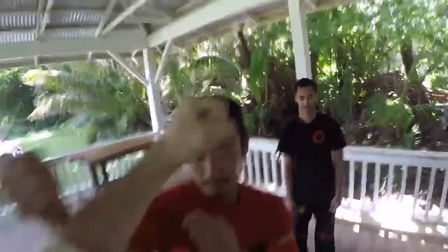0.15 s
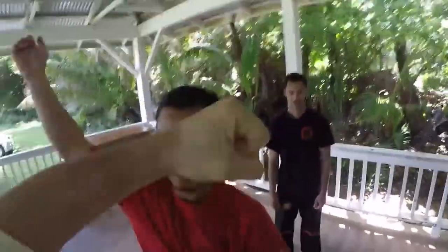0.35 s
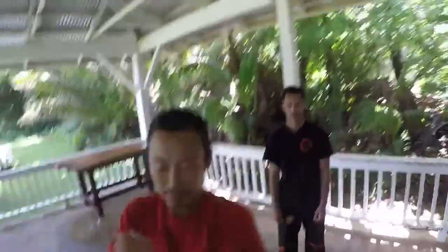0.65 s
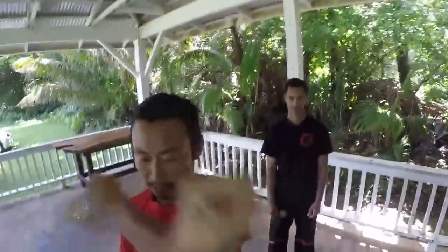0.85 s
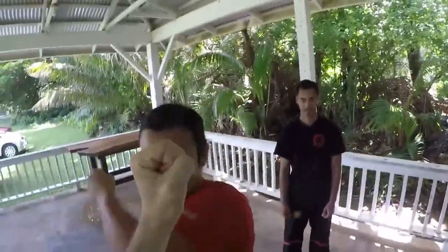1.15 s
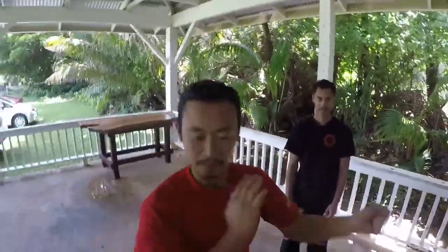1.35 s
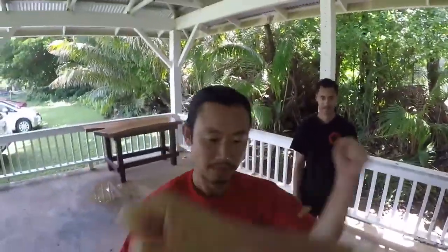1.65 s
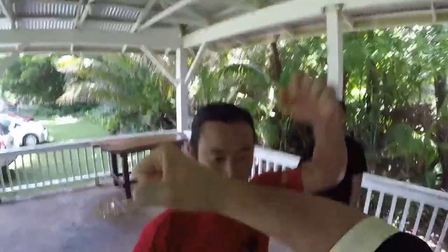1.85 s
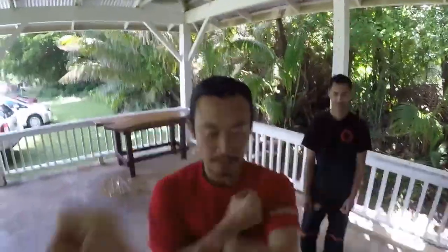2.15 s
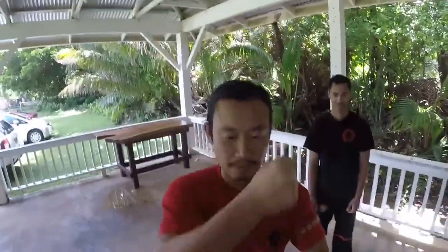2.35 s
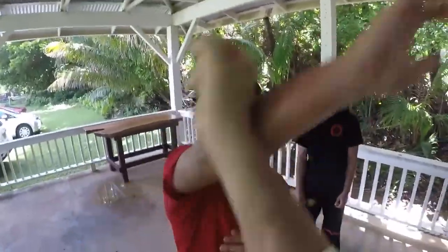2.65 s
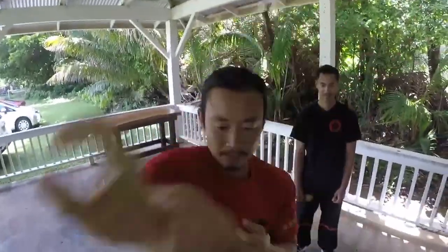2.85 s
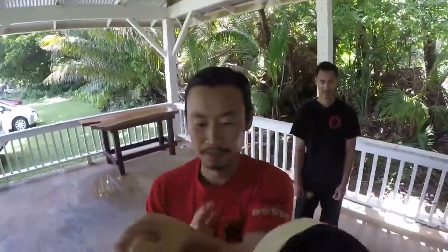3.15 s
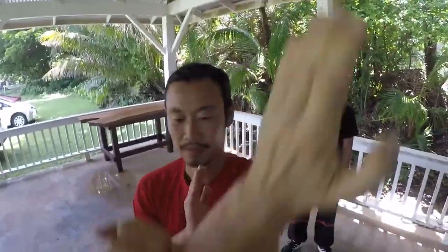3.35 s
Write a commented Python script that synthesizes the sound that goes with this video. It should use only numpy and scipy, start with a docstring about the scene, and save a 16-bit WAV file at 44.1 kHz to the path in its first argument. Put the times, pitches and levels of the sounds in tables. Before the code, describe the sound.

Hands and forearms slap together irregularly on a roofed porch, heard from a body-worn camera; low thumps, mount knocks and wind rumble surround them, the sharpest crack coming just after two seconds, then lighter taps.

```python
"""Two people trade quick blocks on a roofed porch, heard from a camera that one of them wears.
Foliage hiss and air on the ports open it; a first slap follows, with swishing cloth, jolts and mount knocks.
More slaps crack from shaped noise, each with a porch echo; the image narrows and is mono from 1 to 2 s.
Finger ticks, softer swishes and gusts fall between; the hardest slap comes just after 2 s.
Lighter blows follow while the image widens and the hiss rises to the end."""
import sys
import numpy as np
from scipy import signal
from scipy.fft import rfft, irfft
from scipy.io import wavfile
from scipy.ndimage import uniform_filter1d

SR = 44100
rng = np.random.default_rng(int(sys.argv[2]) if len(sys.argv) > 2 else 0)


def generate_wav(sig):
    """Save sig (samples, or channels by samples) to the path in sys.argv[1] as 16-bit PCM at SR."""
    pcm = np.round(np.clip(np.atleast_2d(sig).T, -1, 1) * 32767).astype(np.int16)
    wavfile.write(sys.argv[1], SR, pcm)


N = 154350
T = np.arange(N) / SR  # time_s

# stereo width, a gain on the side signal: time_s, width (0 mono, 1 full)
STEREO_WIDTH = [(0, 0.72), (.35, 0.88), (.55, 0.26), (.85, 0.15), (1.0, .01), (1.97, 0), (2.1, 0.33),
                (2.5, 0.46), (3.5, 0.85)]
# knocks of the camera mount: start_s, level_db (middle), decay_ms (time constant)
MOUNT_KNOCKS = [(0.1223, -31, 5.9), (0.137, -29, 3.5), (0.152, -31.5, 7.6), (0.1691, -18.5, 1.15),
                (0.1767, -22.5, 1.75), (0.212, -32.5, 6.5), (0.224, -30, 5.3), (.236, -37.5, 7.4),
                (.282, -33.5, 2.4), (1.708, -36.5, 1.5), (1.776, -33.5, 6.1), (1.835, -41, 3)]


def undb(db):
    """Decibels to gain."""
    return 10 ** (np.asarray(db) / 20)


def curve(rows):
    """Straight lines through (time_s, value) rows."""
    return np.interp(T, *np.array(rows).T)


def unit(x):
    """Scale to rms 1."""
    return x / np.sqrt(np.mean(x ** 2))


def colour(x, *tables, size=8192):
    """Minimum-phase filter whose response is the sum of (freq_hz, gain_db) tables."""
    log_hz = np.log(np.maximum(np.arange(size // 2 + 1) * SR / size, 1))
    gain_db = 0
    for table in tables:
        freq_hz, point_db = np.array(table).T
        gain_db = gain_db + np.interp(log_hz, np.log(freq_hz), point_db)
    # folding the cepstrum onto positive time makes the filter causal
    cepstrum = irfft(np.log(undb(gain_db)))
    cepstrum[1:size // 2] *= 2
    cepstrum[size // 2 + 1:] = 0
    impulse = irfft(np.exp(rfft(cepstrum)))[:size // 2]
    return signal.fftconvolve(x, impulse)[:len(x)]


def band(x, hz, ratio, order=1):
    """Band-pass from hz / ratio to hz * ratio."""
    sos = signal.butter(order, [hz / ratio, hz * ratio], "band", fs=SR, output="sos")
    return signal.sosfilt(sos, x)


def add(out, x, start_s):
    """Mix a middle and side pair in at a time."""
    i = int(start_s * SR)
    out[:, i:i + x.shape[1]] += x[:, :N - i]


def burst(decay_ms, size=4096):
    """Middle and side noise that dies away exponentially."""
    return rng.standard_normal((2, size)) * np.exp(-T[:size] * 1e3 / decay_ms)


def blow(x, level_db):
    """Set the level of a short sound, as if its energy filled 8 ms."""
    level_window_s = 0.008
    return x * undb(level_db) * np.sqrt(level_window_s * SR / np.sum(x ** 2))


def garden():
    """Distant foliage hiss, duller while the image is narrow, over a low rumble."""
    # hiss level: time_s, level_db
    hiss_level = [(0, -42.5), (.15, -48.5), (.2, -57), (.33, -53.5), (.46, -61), (.6, -52.5), (.8, -54),
                  (1.1, -50), (1.5, -45), (2.0, -46.5), (2.6, -48), (2.85, -45.5), (3.3, -42.5),
                  (3.5, -39.5)]
    # hiss colours, wide and narrow image: freq_hz, gain_db
    wide_colour, narrow_colour = [(240, -11.5), (400, -2), (660, -4.3), (1440, -10.5), (2090, -12.5),
                                  (2630, -16.5), (5520, -14), (12300, -37), (16000, -53)], [(240, 0), (400, -0.5), (700, -6.5), (1500, -6),
                                                     (2400, -12.5), (4600, -13), (5700, -27), (8500, -25.5),
                                                     (10700, -27.5), (12000, -37), (16000, -73)]
    # extra colour of the side: freq_hz, gain_db
    side_colour = [(200, 1.5), (600, -2), (1200, 4.5), (2200, 0.5), (4000, -5), (7000, 3), (14000, -3)]
    rumble_db, wide_cut_db = 2, 11  # against the hiss; cut at full width

    width = curve(STEREO_WIDTH)
    wide_noise, narrow_noise, side_noise, rumble_noise = rng.standard_normal((4, N))
    wide = unit(colour(wide_noise, wide_colour))
    narrow = unit(colour(narrow_noise, narrow_colour))
    mid = width * wide + np.sqrt(1 - width ** 2) * narrow
    side = colour(unit(colour(side_noise, wide_colour)), side_colour)
    rumble = unit(band(rumble_noise, 115.4, ratio=1.57, order=2))
    rumble = rumble * undb(rumble_db - wide_cut_db * width)
    return np.array([mid + rumble, side]) * undb(curve(hiss_level))


def buffeting():
    """Moving air rumbles on the ports; strong gusts add a higher flutter."""
    # gust level: time_s, level_db
    gust_level = [(0, -23), (.1, -23), (.16, -12), (.27, -27), (.42, -45), (.54, -32), (.82, -35.5),
                  (.92, -17), (1.05, -29.5), (1.25, -26), (1.5, -36.5), (1.6, -36), (1.74, -11),
                  (1.95, -27.5), (2.12, -15.5), (2.3, -33.5), (2.45, -26), (2.6, -32.5), (2.8, -28.5),
                  (2.93, -22), (3.05, -30.5), (3.22, -19), (3.5, -23)]
    # rumble of moving air: freq_hz, gain_db
    air_colour = [(12, -6.5), (28, 10.5), (55, -1.5), (125, -13), (190, -30.5), (330, -36), (900, -75.5)]
    side_db, flutter_db = -9.5, -6

    def steady(x):
        """Even out the noise's own swells over about 90 ms."""
        return x / np.sqrt(uniform_filter1d(x ** 2, size=4000))

    mid, side = (steady(colour(noise, air_colour)) for noise in rng.standard_normal((2, N)))
    gust = undb(curve(gust_level))
    flutter = unit(band(rng.standard_normal(N), 164, ratio=1.8, order=2))
    flutter = flutter * gust ** 2 * undb(flutter_db)  # squared: favours strong gusts
    return np.array([mid * gust + flutter, side * gust * undb(side_db)])


def swishes(size=32768):
    """Cloth slides along an arm: grainy hiss that swells and fades."""
    # sleeve swishes: peak_s, level_db, rise_s, fall_s, centre_hz, broad_db (broad hiss against the resonance)
    sleeve_moves = [(0.131, -33, 0.015, 0.029, 5450, 2), (1.24, -50, 0.046, 0.053, 3770, -2),
                    (1.418, -47, 0.046, 0.11, 3800, -25), (1.801, -41.5, 0.02, 0.021, 1500, -15),
                    (2.218, -41, 0.16, 0.078, 3780, 7), (2.413, -42, 0.011, 0.015, 4970, -3),
                    (2.828, -52.5, 0.12, 0.17, 5050, 28), (3.495, -37.5, 0.054, 0.046, 5350, 23)]
    cloth_hz, side_db = 3180, -3

    out = np.zeros((2, N))
    for peak_s, level_db, rise_s, fall_s, centre_hz, broad_db in sleeve_moves:
        start_s = max(peak_s - size / SR / 2, 0)
        t = T[:size] + start_s - peak_s
        grain_db = 2 * np.repeat(rng.standard_normal(size // 128), 128)  # a new level every 3 ms
        noise = rng.standard_normal((2, size)) * undb(grain_db)
        resonance = unit(band(noise, centre_hz, ratio=1.25, order=3))
        broad = unit(band(noise, cloth_hz, ratio=2.14, order=3))
        rub = unit(resonance + undb(broad_db) * broad)
        swell = np.exp(-(t / np.where(t < 0, rise_s, fall_s)) ** 2)
        add(out, rub * undb(level_db) * swell, start_s)
    return out * undb([[0], [side_db]])


def porch(zones):
    """Floor and roof answer a slap after a short gap; a diffuse tail follows, shorter in the treble."""
    # colour of the echo: freq_hz, gain_db
    echo_colour = [(150, -24), (750, 8), (1500, 9.5), (3000, 7.5), (4500, 13), (5700, 1.5), (9000, 1),
                   (11200, -11.5), (13500, -2.5), (16000, -25)]
    # extra colour of the side: freq_hz, gain_db
    echo_side = [(1000, 5), (3500, -19), (6500, 13), (13000, 5)]
    gap_s, early_gain, early_s = 0.0037, 1, 0.016
    t60_s, treble_t60_s, split_hz = 0.72, 0.54, 3300

    t = T[:SR]
    fade_in = np.clip(t / gap_s - 1, 0, 1)
    swell = fade_in * (1 + early_gain * np.exp(-t / early_s))
    noise = rng.standard_normal((2, SR))
    low = signal.sosfiltfilt(signal.butter(3, split_hz, fs=SR, output="sos"), noise)
    treble = noise - low
    tail = low * 1e-3 ** (t / t60_s) + treble * 1e-3 ** (t / treble_t60_s)
    mid, side = (colour(colour(x * swell, zones), echo_colour) for x in tail)
    return np.array([mid, colour(side, echo_side)])


def even_noise(shape):
    """A noise burst with its spectrum flattened, then softly enveloped again."""
    x = rng.standard_normal(len(shape)) * shape
    flat = irfft(np.exp(1j * np.angle(rfft(x))))
    return flat * shape ** 0.25


def slaps(size=2048):
    """Skin slaps: noise bursts rise briefly and die away, ring two pockets under the hand and echo in the porch."""
    # skin slaps: peak_s, body_db, crack_db, snap_db (zone gains), rise_ms, decay_ms (time constants of the
    # first burst), echo_db (porch gain), palm_hz, palm_db, finger_hz, finger_db (air pockets), hollow_hz
    skin_slaps = [(0.114, -23, -29.5, -30.5, 0.15, 5, -18.5, 770, -13, 1480, -19, 3400),
                  (0.5198, -25.5, -23.5, -29, 0.33, 0.99, -18.5, 2120, 7.5, 5300, 2.5, 4250),
                  (0.8881, -32, -24.5, -25.5, 1.1, 0.57, -14.5, 553, 14.5, 3320, -3.5, 2420),
                  (1.6880, -24.5, -28, -33, 1.3, 0.74, -12, 2960, 3, 4230, 7.5, 1700),
                  (2.0745, -18, -5, -15, 2.04, 0.8, -22.5, 954, 8, 1980, 0, 1290),
                  (2.3957, -27.5, -35.5, -36.5, 0.9, 0.91, -19.5, 496, 8.5, 5960, 2.5, 4500),
                  (2.4034, -25.5, -41, -45.5, 0.28, 1.8, -37, 378, 4, 3640, 8, 2590),
                  (3.1494, -29, -32, -33, 0.075, 0.56, -20, 1520, -1, 5300, 9.5, 2550)]
    # centres of the body, crack and snap zones: freq_hz
    zone_centres = [840, 2760, 6000]
    # colour of skin on skin: freq_hz, gain_db
    skin_colour = [(120, 18), (400, 6.5), (1300, 9), (3100, 8.5), (4300, 9.5), (5500, 8.5), (8000, -2),
                   (11000, -11.5), (13000, -7), (16000, -16)]
    # extra colour of the side: freq_hz, gain_db
    slap_side = [(1000, -4.5), (3000, 1), (6500, 2.5), (13000, 12)]
    pocket_ratio, hollow_ratio = 1.046, 1.097  # half-widths

    out = np.zeros((2, N))
    lead = size // 8  # samples ahead of the peak
    t = T[:size] - T[lead]
    for (peak_s, body_db, crack_db, snap_db, rise_ms, decay_ms, echo_db,
         palm_hz, palm_db, finger_hz, finger_db, hollow_hz) in skin_slaps:
        shape = np.exp(1e3 * np.where(t < 0, t / rise_ms, -t / decay_ms))
        zones = list(zip(zone_centres, (body_db, crack_db, snap_db)))
        mid, side = (colour(blow(even_noise(shape), 0), skin_colour, zones) for _ in range(2))
        palm = undb(palm_db) * band(mid, palm_hz, pocket_ratio)
        finger = undb(finger_db) * band(mid, finger_hz, pocket_ratio)
        hit = np.array([mid + palm + finger, colour(side, slap_side)])
        hollowed = hit - band(hit, hollow_hz, hollow_ratio)
        add(out, hollowed, peak_s - T[lead])
        add(out, porch(zones) * undb(echo_db), peak_s)
    return out


def jolts(size=8192):
    """Each shove is a heavily damped low swing with a soft start; a shaken mount makes the ports disagree."""
    # jolts through arms and body: start_s, swell_db (envelope peak), pitch_hz
    body_jolts = [(0.116, -7, 116), (0.137, -6.5, 32.7), (.175, 1, 116), (0.185, -1, 208),
                  (0.218, -0.5, 85), (0.5185, -13.5, 136), (0.886, -12.5, 98), (0.932, -11.5, 94),
                  (0.966, -7.5, 52), (1.238, -15.5, 86), (1.276, -16, 34), (1.69, -12.5, 340),
                  (1.6878, -8.5, 130), (1.708, -2.5, 42), (1.74, -10.5, 133), (1.777, -2.5, 44),
                  (1.849, -8.5, 73), (1.878, -8.5, 31.5), (2.0704, -4, 97), (2.168, -12.5, 59),
                  (2.4, -17, 108), (2.881, -20.5, 24), (3.162, -10.5, 49.4), (3.266, -16, 33.5),
                  (3.346, -17, 32)]
    peak_cycles = 0.55  # cycles until the swell peaks

    out = np.zeros((2, N))
    for start_s, swell_db, pitch_hz in body_jolts:
        cycles = T[:size] * pitch_hz
        rise = cycles / peak_cycles
        swell = undb(swell_db) * (rise * np.exp(1 - rise)) ** 2
        # a knock within 20 ms means a shaken mount
        shaken = min(abs(start_s - knock[0]) for knock in MOUNT_KNOCKS) < 0.02
        side_db = -5 if shaken else -17
        mid = -np.sin(2 * np.pi * cycles)
        side = undb(side_db) * np.cos(2 * np.pi * cycles)
        add(out, swell * np.array([mid, side]), start_s)
    return out


def knocks():
    """The plastic mount shifts and knocks: decaying noise in its colour, different at each port."""
    # colour of the mount: freq_hz, gain_db
    mount_colour = [(60, -14), (400, 2.5), (850, -7), (1550, 4), (2050, -13), (2550, -13.5), (3200, -38),
                    (8000, -55)]
    side_db = 7.5  # against the middle, before the stereo width

    out = np.zeros((2, N))
    for start_s, level_db, decay_ms in MOUNT_KNOCKS:
        mid, side = (colour(x, mount_colour) for x in burst(decay_ms))
        add(out, np.array([blow(mid, level_db), blow(side, level_db + side_db)]), start_s)
    return out


def touches():
    """Fingers tick lightly against an arm: very short bursts of narrow noise."""
    # finger touches: start_s, level_db (middle), centre_hz
    finger_ticks = [(1.250, -52.5, 6760), (2.503, -47.5, 1210), (2.772, -40.5, 1370), (2.811, -45.5, 5300),
                    (3.252, -41.5, 1100), (3.339, -43, 1920)]

    out = np.zeros((2, N))
    for start_s, level_db, centre_hz in finger_ticks:
        mid, side = band(burst(decay_ms=1.0), centre_hz, ratio=1.1)
        add(out, np.array([blow(mid, level_db), blow(side, level_db + 2)]), start_s)
    return out


def scene():
    """All sources as middle and side, spread to left and right by the stereo width."""
    mid, side = garden() + buffeting() + swishes() + slaps() + jolts() + knocks() + touches()
    side = side * curve(STEREO_WIDTH)
    return np.array([mid + side, mid - side])


def record(dry):
    """A limiter ducks at the hardest blows and recovers steadily; spikes that slip past clip; the top is cut."""
    limit_db, release_db_per_s, top_hz = -2.5, 39, 15800

    power = uniform_filter1d((dry ** 2).max(axis=0), size=48)  # about 1 ms, louder channel
    over_db = np.maximum(10 * np.log10(np.abs(power) + 1e-9) - limit_db, 0)
    # hold each overshoot and let it fall at the release rate
    release_db = release_db_per_s * T
    duck_db = np.maximum.accumulate(over_db + release_db) - release_db
    gain = uniform_filter1d(undb(-duck_db), size=32)
    held = np.clip(dry * gain, -1, 1)
    top_cut = signal.ellip(8, 0.2, 80, top_hz, fs=SR, output="sos")
    return signal.sosfilt(top_cut, held)


dry = scene()
out = record(dry)
generate_wav(out)
```